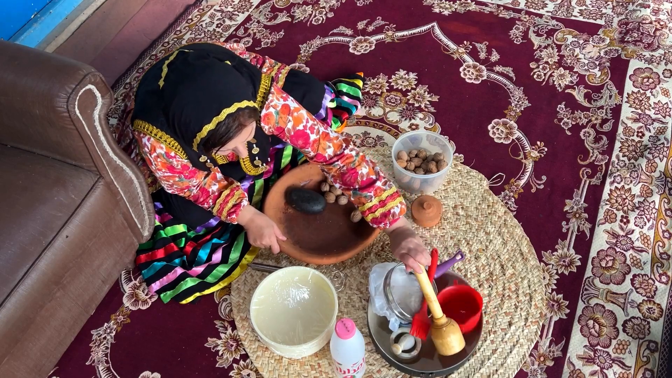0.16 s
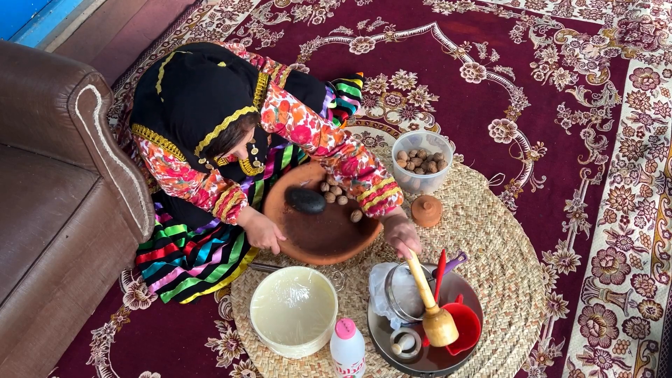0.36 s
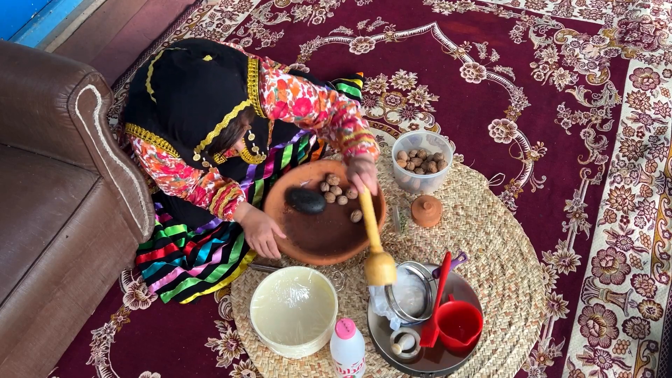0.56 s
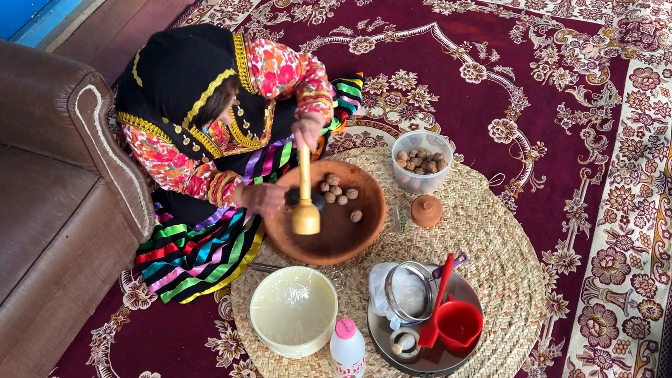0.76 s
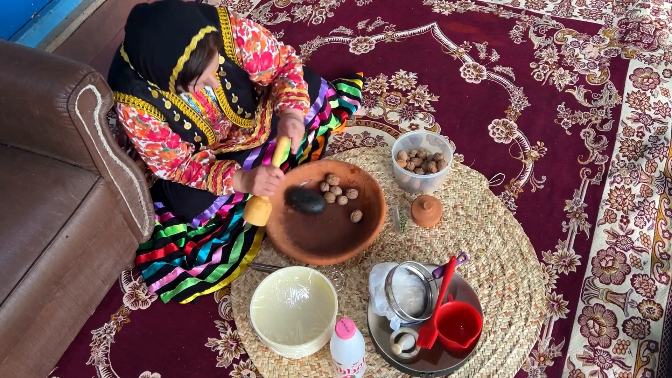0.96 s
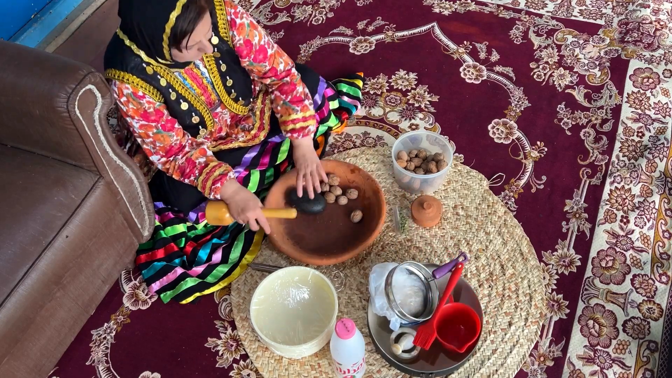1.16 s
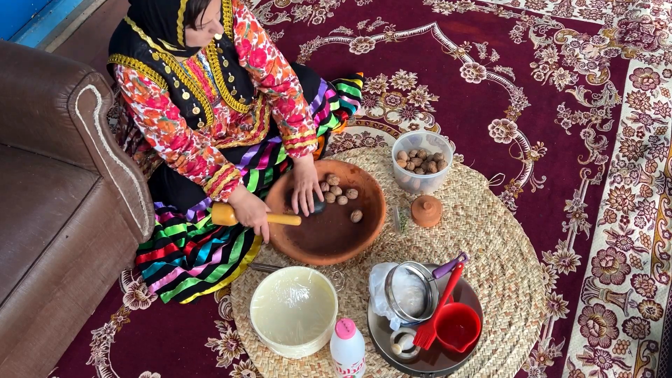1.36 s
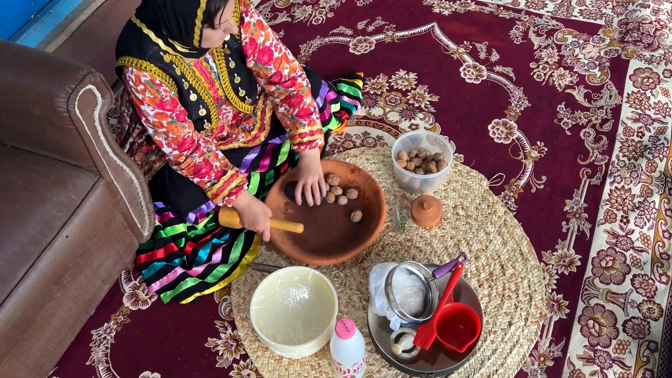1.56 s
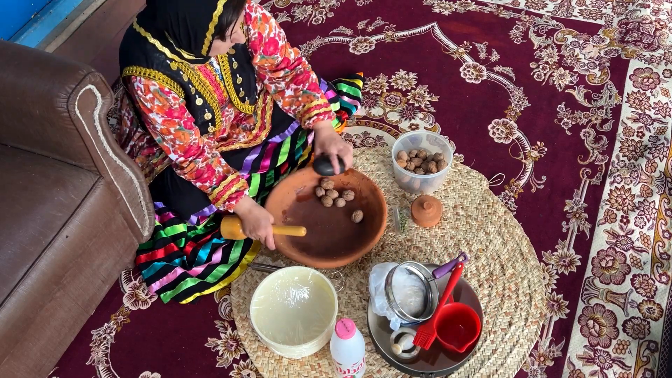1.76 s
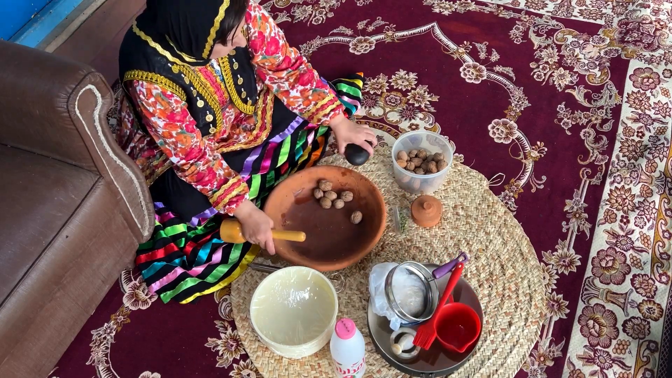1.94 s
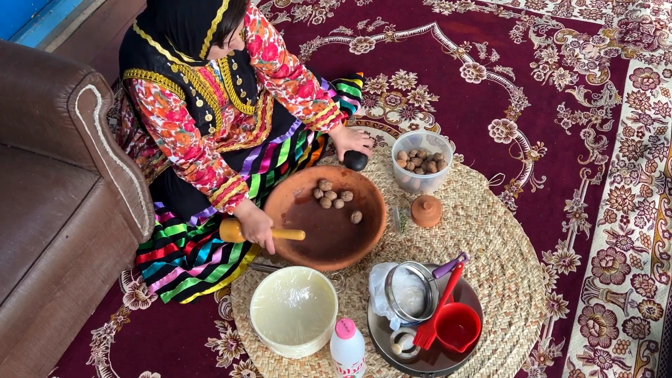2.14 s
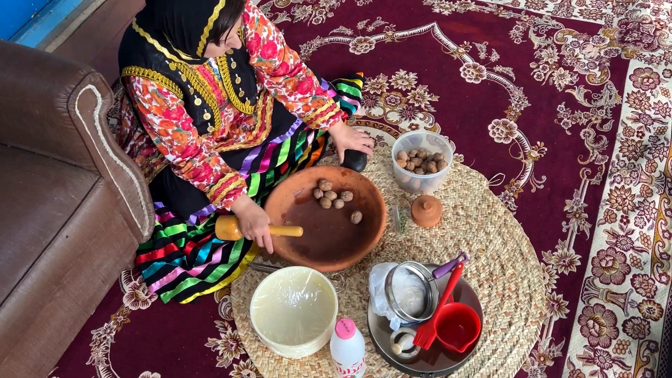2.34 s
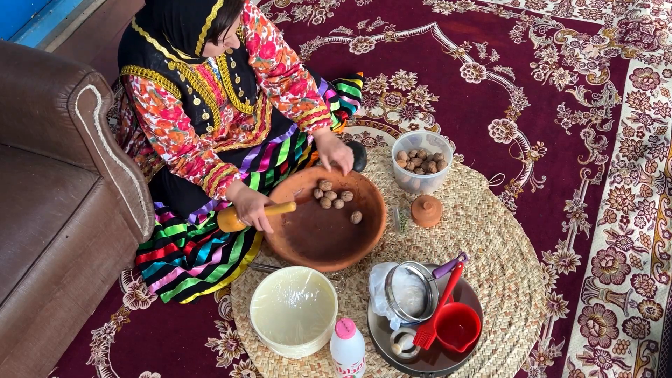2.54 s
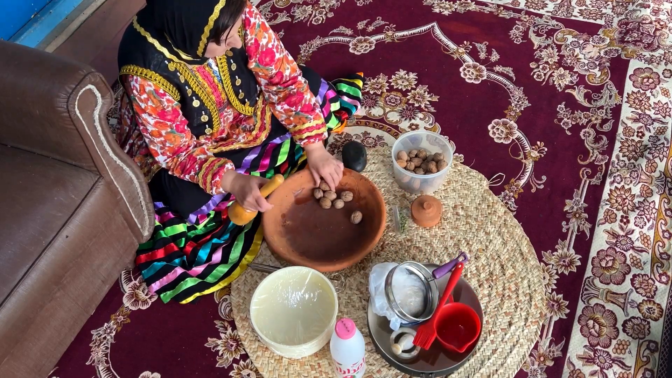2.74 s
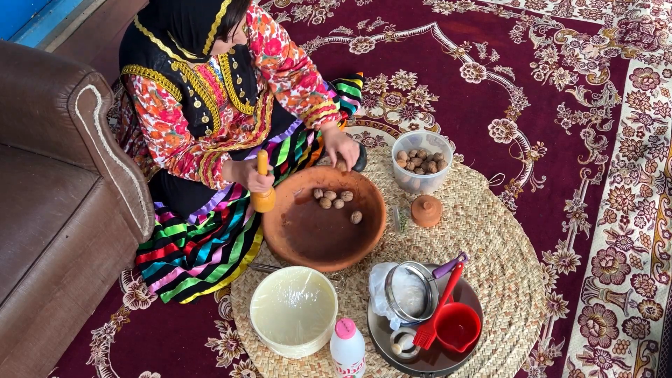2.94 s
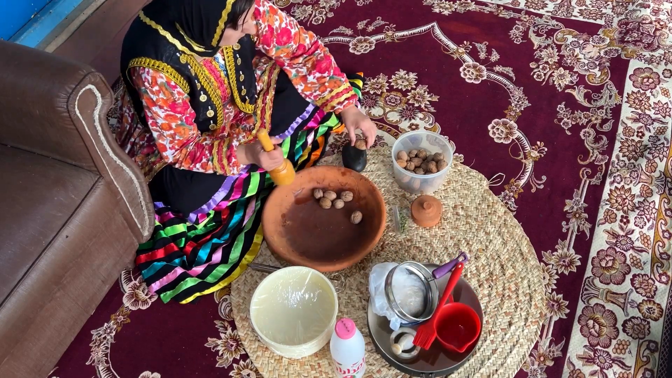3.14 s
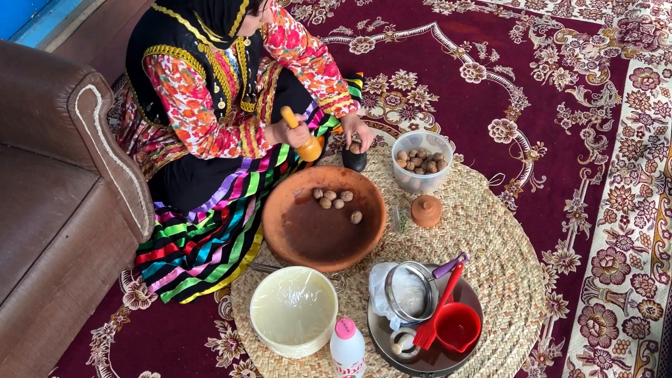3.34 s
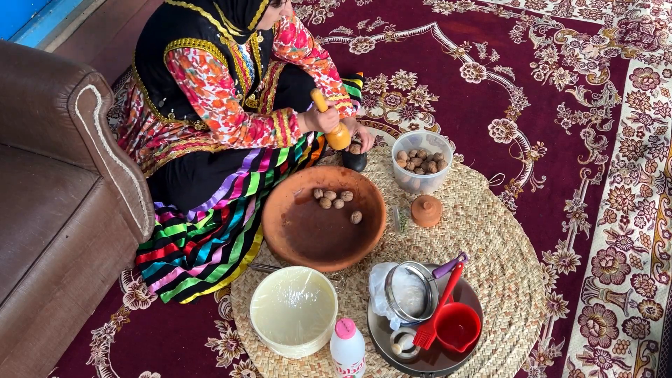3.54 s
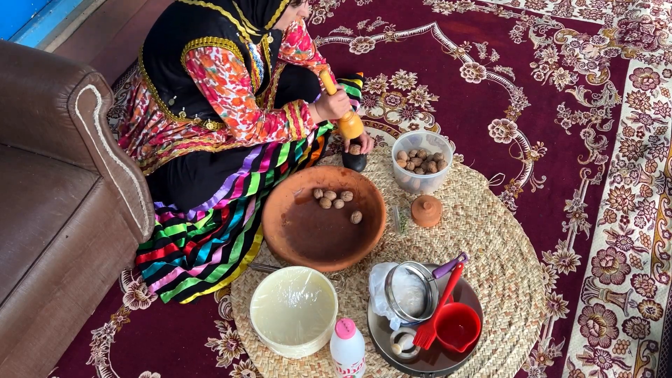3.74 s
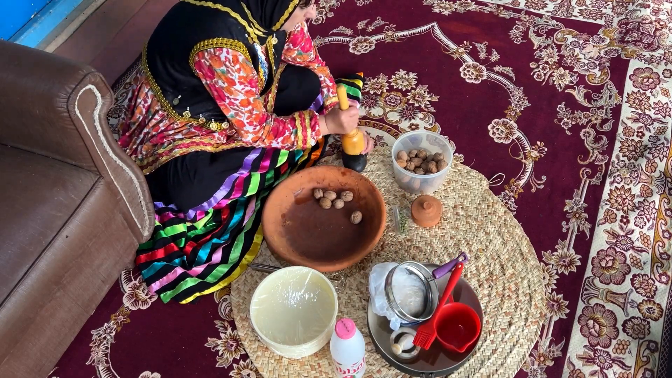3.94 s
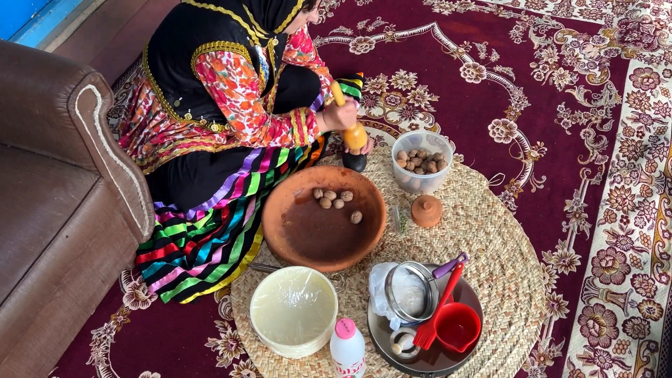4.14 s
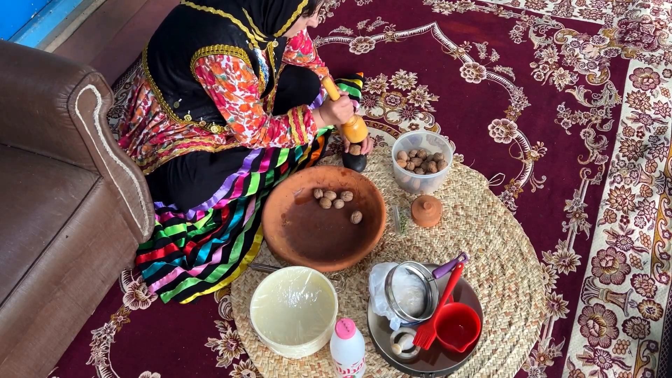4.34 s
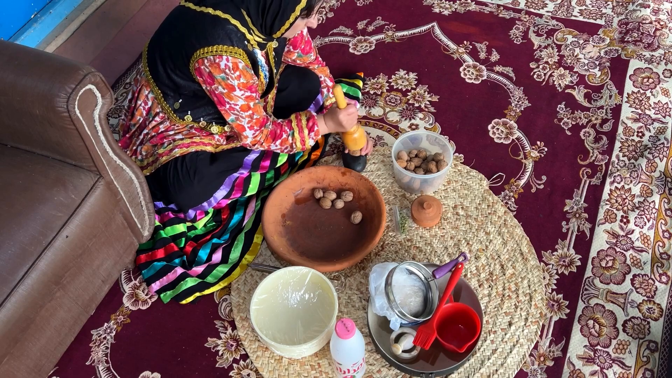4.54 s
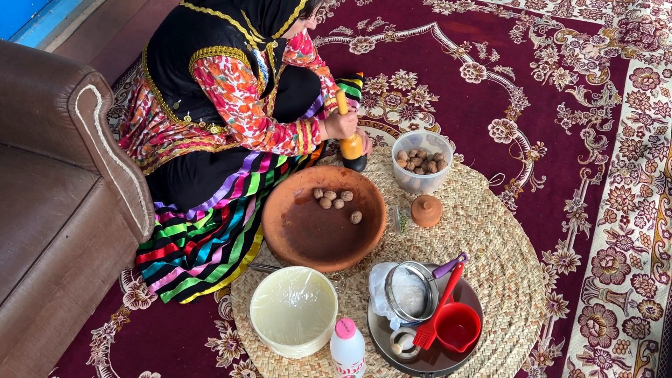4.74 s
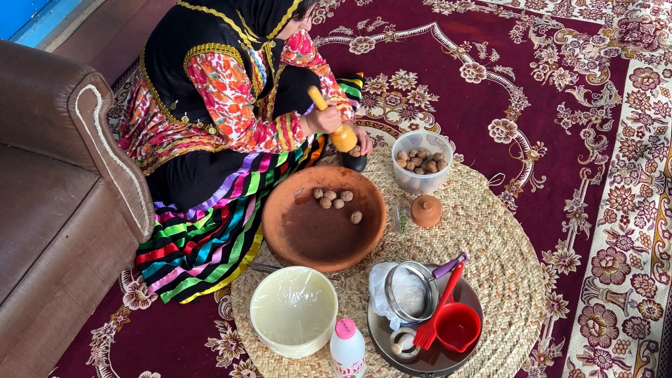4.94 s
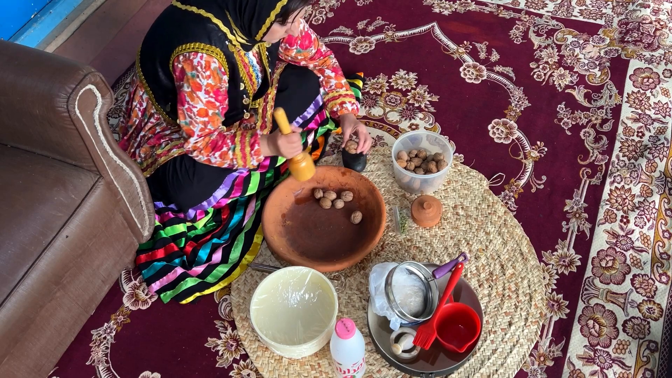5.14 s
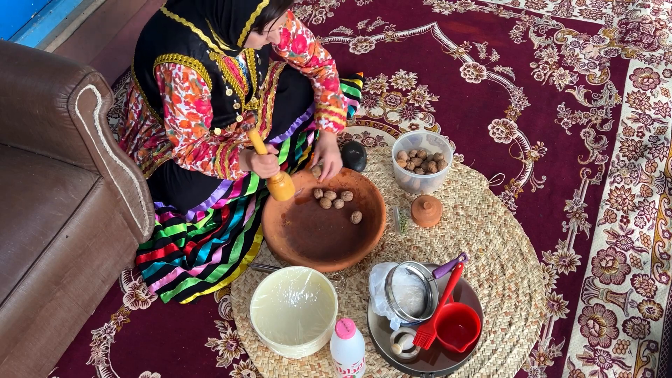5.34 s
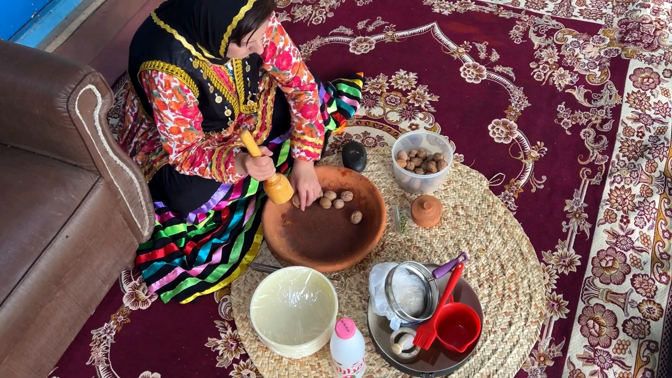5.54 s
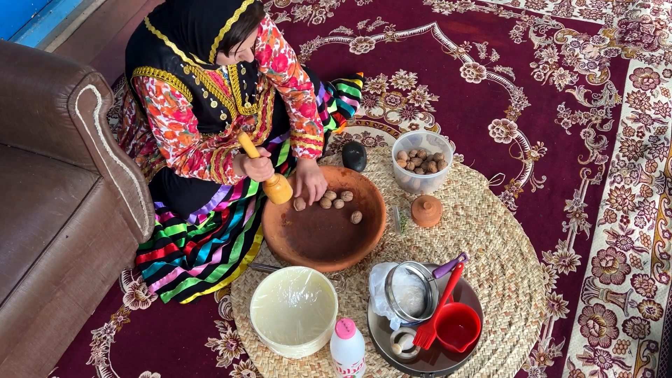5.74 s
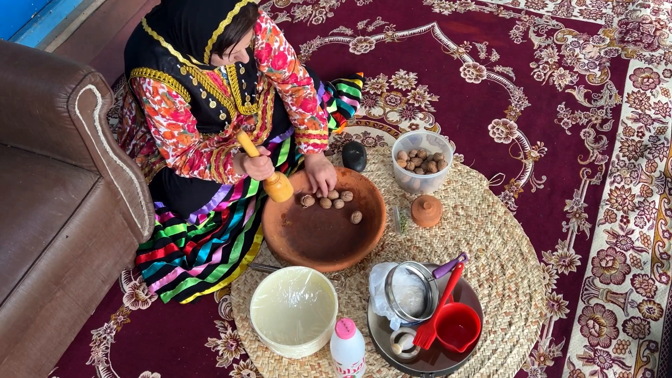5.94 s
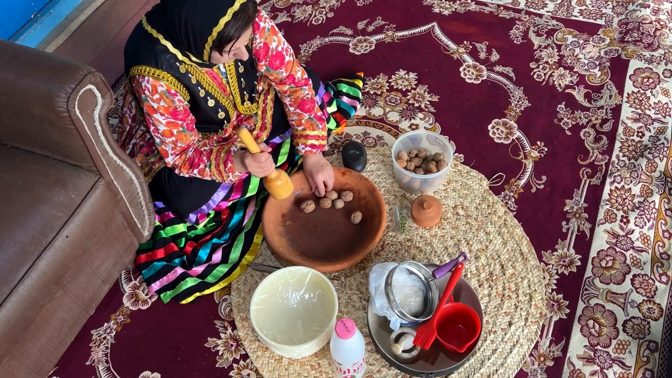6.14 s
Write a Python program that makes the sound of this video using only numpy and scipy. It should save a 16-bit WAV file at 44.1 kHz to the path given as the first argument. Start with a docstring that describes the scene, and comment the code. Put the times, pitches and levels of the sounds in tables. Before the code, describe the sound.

Hollow plastic clattering and light taps of nuts on clay surround four sharp knocks splitting a walnut shell, with soft hiss indoors.

```python
"""A plastic cup tips and clatters on a tray, hollow and bright, as a wooden pestle is lifted off.
Walnuts tick and roll in a ringing clay bowl, then four pestle blows crack a nut on a stone: the
shell snaps and crumbles, the wood knocks, the carpeted floor booms. Contacts ring short, decaying
modes; rattles and rolls are swarms of tiny contacts. The room is small and dull, and a handheld
camera hisses throughout."""
import sys
import numpy as np
from scipy import signal
from scipy.fft import rfft, irfft, next_fast_len
from scipy.io import wavfile
from scipy.ndimage import uniform_filter1d

SR = 44100
rng = np.random.default_rng(int(sys.argv[2]) if len(sys.argv) > 2 else 0)


def bounce(signal):
    """Save signal as a 16-bit WAV file at the path given by the first command-line argument."""
    frames = np.transpose(np.atleast_2d(signal))
    limited = np.clip(frames, -1, 1)
    pcm = np.round(limited * 32767).astype(np.int16)
    wavfile.write(sys.argv[1], SR, pcm)


N = 277389
FFT_SIZE = next_fast_len(N)

# Hollow knocks: the cup clatters on the tray; the last three are dull knocks of the pestle changing
# hands. Each row: start in seconds, body peak in dB, body centre in Hz, wall in dB against the body,
# wall centre in Hz, click in dB against the body.
HOLLOW_KNOCKS = [(.032, -35, 900, -9, 2000, -30), (.095, -28, 700, 2, 2570, -8),
                 (.101, -26, 910, -15, 2400, -20), (0.125, -28, 920, -10, 2500, -20),
                 (.176, -29, 640, -13, 2400, -30), (0.1791, -11.5, 620, -6.5, 3370, -23),
                 (.183, -17, 443, -5, 3400, -30), (0.196, -15, 760, -12, 3400, -18),
                 (.200, -22, 590, -1, 2030, -28), (.206, -19.5, 550, -14, 3420, -30),
                 (.210, -13, 860, -4, 3580, -24), (.212, -8, 617, -7, 1990, -30),
                 (.227, -32, 566, -10, 2050, -30), (.2352, -12.5, 630, -23, 2480, -36),
                 (.2523, -19.5, 560, -14, 2500, -36), (.263, -27, 544, -24.5, 2300, -36),
                 (.274, -22.5, 534, -22, 2300, -36), (.281, -28, 505, -33, 2300, -36),
                 (.293, -35, 563, -22, 2000, -36), (.312, -37, 550, -21, 1980, -36),
                 (.332, -33, 750, -12, 2000, -36), (0.342, -30, 630, -13, 2210, -30),
                 (0.358, -39, 800, -17, 2200, -36), (.4415, -21, 624, -9.5, 2620, -28),
                 (.447, -25, 680, -18, 2500, -36), (.500, -27, 597, -17, 2300, -33),
                 (.525, -29, 560, -17, 2200, -33), (1.116, -34, 525, -31, 2000, -36),
                 (1.128, -34, 850, -14.5, 2010, -33), (1.138, -32.5, 615, -23, 2000, -36)]
# The cup slides and trembles. Each row: time in seconds, body level in dB, wall level in dB.
CUP_RATTLE = [(0, -50, -58), (.035, -43.5, -52), (.075, -60, -74), (.1, -43.5, -45), (.165, -49, -52),
              (.205, -33, -33), (.26, -47, -51), (.31, -41.5, -55), (.37, -45, -46), (.44, -49, -58),
              (.58, -68, -73)]
# The cup's hollow body. Each row: pitch in Hz, relative level in dB, base t60 in seconds.
CUP_BODY_MODES = [(430, -5, 0.11), (526, 10.5, 0.051), (572, 3.5, 0.048), (755, 2, 0.07), (857, 0.5, 0.061),
                  (901, 3, 0.067), (1014, -20, 0.061), (1238, 6, 0.1), (1620, 7, 0.051)]
# Its thin wall. Each row: pitch in Hz, relative level in dB, base t60 in seconds.
CUP_WALL_MODES = [(1180, -1.5, 0.031), (1570, -3, 0.017), (2010, 0.5, 0.017), (2550, 0, 0.013),
                  (3000, -5, 0.012), (3413, 1.5, 0.011), (4100, -3, 0.014), (4640, 1, 0.014),
                  (5400, -2, 0.008), (6450, -2, 0.006), (8100, 1, 0.008)]
# Flat, dull knocks ring on; rim knocks are damped. Each row: wall in dB against the body, t60 factor.
KNOCK_DAMPING = [(-30, 1.5), (-17, 0.73), (-2, 0.32)]
# The tone of the noise bed on the left. Each row: frequency in Hz, relative level in dB.
HISS_EQ = [(25, -18), (45, -4.5), (90, 6), (130, -1), (260, -2.5), (650, -0.5), (1500, -2.5), (2600, -7.5),
           (4200, -10.5), (6200, -11.5), (7400, -15.5), (10000, -16.5), (11200, -17), (13000, -24.5),
           (15650, -20), (15950, -56)]
# The stereo image of the hiss. Each row: frequency in Hz, likeness of left and right from 0 to 1,
# the right channel's phase lead in half turns, its level against the left in dB.
HISS_IMAGE = [(0, .96, 0, -2), (170, .88, .05, -2.5), (400, .35, .4, -2), (750, .45, .85, -1),
              (1500, .35, .92, -2), (2000, .15, 1.5, -1.5), (2600, .46, 1.78, -1.5), (3700, .1, 1.8, -4.5),
              (5000, .14, 1.7, -9), (6400, .1, 1.6, -7), (8400, .67, 2.45, -2), (9450, 1, 3, 0),
              (10850, 1, 3, 0), (11500, .65, 3.4, 0), (12600, 1, 4, 0), (14100, 1, 4, 0),
              (14700, .65, 4.35, 0), (16000, .6, 4.8, 0)]
# The stereo image of the near sounds, with the same columns.
NEAR_IMAGE = [(0, .99, 0, -2), (300, .98, 0, -2.5), (550, .97, .05, .5), (850, .95, .1, 1.5),
              (2400, .8, -.14, 1), (3400, .8, -.35, -2), (5200, .65, -.15, -6), (6300, .75, .15, -5.5),
              (7900, .8, .28, -1), (9300, .96, .86, 0), (10000, 1, 1, 0), (16500, .96, 2.95, 0)]
# A nut taps the bowl. Each row: start in seconds, peak in dB, ring centre in Hz,
# shell click in dB against the bowl.
BOWL_TICKS = [(1.436, -35.5, 810, -25), (1.447, -30, 1390, -8), (1.4665, -30, 3160, -2),
              (2.756, -38.5, 1400, -9), (5.628, -26, 2480, 5), (5.632, -30, 2920, 5),
              (5.7785, -30, 2300, -29), (5.879, -37, 2170, -13), (5.852, -39, 2500, -6),
              (5.899, -33, 1680, -20), (5.906, -32, 2210, -20), (5.950, -37, 3000, -17),
              (6.031, -37, 2380, -20), (6.041, -30.5, 2160, -20)]
# Nuts roll. Each row: start in seconds, length in seconds, level in dB, ring centre in Hz.
BOWL_ROLLS = [(1.439, 0.047, -53, 1520), (5.897, 0.063, -49, 1900), (5.991, 0.083, -46.5, 1850),
              (6.157, 0.035, -49, 1480), (6.253, 0.024, -52, 2400)]
# Fired clay. Each row: pitch in Hz, relative level in dB, base t60 in seconds.
BOWL_MODES = [(824, 1, 0.16), (1400, 0, 0.074), (1580, -8, 0.027), (2070, -7, 0.017), (2192, 4.5, 0.037),
              (2380, 0, 0.05), (2540, -6, 0.019), (2970, -5, 0.02), (3228, 3, 0.026)]
# Walnut shell. Each row: pitch in Hz, relative level in dB, base t60 in seconds.
SHELL_MODES = [(1340, -4, 0.03), (1940, -4.5, 0.017), (2310, -5, 0.021), (2710, 1.5, 0.01),
               (3060, 0, 0.0071), (3410, 1, 0.01), (3720, 1.5, 0.0078), (4180, 3, 0.0076),
               (4740, 2, 0.0093), (5040, -1, 0.012), (5950, 0, 0.0087), (6550, -3, 0.014),
               (7200, 1, 0.0064), (8350, 3, 0.007)]
# The shell breaks. Each row: start in seconds, peak in dB, ring centre in Hz, tick in dB against the ring.
SHELL_SNAPS = [(3.8862, -15, 4000, -3), (3.8903, -21, 4600, -18), (3.8938, -20, 4300, -5),
               (3.894, -21, 2150, -20), (3.898, -21, 2250, -18), (3.8985, -24, 4500, -15),
               (4.1851, -3, 3100, -9), (4.1862, -5, 2300, -12), (4.1858, -12, 6100, 6),
               (4.1865, -20, 1290, -20), (4.1902, -17, 4000, -14), (4.194, -18, 6000, -8),
               (4.198, -20, 2520, -14), (4.4504, -13, 3340, -3), (4.4517, -4, 6500, -5),
               (4.452, -23, 1290, -20), (4.4533, -6, 2000, -2), (4.4538, -10, 6600, -2),
               (4.4605, -12, 6300, -2), (4.4603, -16, 1986, -8), (4.47, -22, 6000, -6),
               (4.7303, -23, 3100, 0), (4.7304, -25, 6600, -3), (4.7363, -18, 7000, 0),
               (4.7365, -19, 4750, -6), (4.7365, -16, 2800, -8)]
# The pestle lands. Each row: start in seconds, levels of knock, boom and crumble in dB, then the
# crumble's t60 in seconds, centre in Hz and roll-off in dB per octave.
PESTLE_BLOWS = [(3.887, -19, -40, -26.5, 0.12, 3870, 35), (4.185, -31, -35.5, -23, 0.15, 3000, 3.5),
                (4.4508, -36, -33.5, -16.5, 0.1, 5000, 2), (4.731, -53, -40, -31.5, 0.13, 4500, 5)]
# The wooden knock. Each row: pitch in Hz, relative level in dB, base t60 in seconds.
PESTLE_MODES = [(267, -4, 0.057), (413, 2, 0.044), (507, -11, 0.089), (825, -10, 0.013)]
# The floor answers late. Each row: pitch in Hz, level in dB against the boom,
# delay in seconds counted from 15 ms before the blow, t60 in seconds.
FLOOR_MODES = [(149, 3.5, 0.0204, 0.077), (93.5, 2.5, 0.0446, 0.12)]
# The base tone of crumbling shell. Each row: frequency in Hz, relative level in dB.
CRUMBLE_EQ = [(600, -8), (1300, -4), (2000, -3.5), (3000, -2.5), (4200, 2), (5300, -1), (6500, 1.5),
              (9000, 1.5), (12000, 3), (16000, -12)]


def gain_of(db):
    """Decibels to a factor."""
    return 10 ** (np.asarray(db) / 20)


def unit_rms(x):
    """Scales to rms 1."""
    return x / np.sqrt(np.mean(x ** 2) + 1e-20)


def unit_peak(x):
    """Scales to peak 1."""
    return x / abs(x).max()


def add(mix, start, sound):
    """Mixes a sound in at start seconds."""
    part = mix[round(start * SR):][:len(sound)]
    part += sound[:len(part)]


def equalise(x, points):
    """Filters by (Hz, dB) points joined on a log axis."""
    hz, db = np.transpose(points)
    bins = np.fft.rfftfreq(len(x), 1 / SR)
    return irfft(rfft(x) * gain_of(np.interp(np.log(bins + 1), np.log(hz), db)), len(x))


def ring(modes, centre_hz, rolloff_db, t60_scale, cycles=1.187, spread_ms=0):
    """A contact drives the modes for some cycles of centre_hz; each octave away loses rolloff_db."""
    hz, db, t60 = np.transpose(modes)[:, :, None]
    late = spread_ms / 1000 * rng.random(hz.shape)  # a tearing contact staggers the modes
    t = np.arange(round(SR * (t60.max() * t60_scale + .004))) / SR - cycles / centre_hz - late
    attack = np.cos(np.pi / 2 * np.clip(t * centre_hz / cycles, -1, 0)) ** 2
    struck_db = db - rolloff_db * abs(np.log2(hz / centre_hz))
    decay_db = 60 * np.maximum(t, 0) / (t60 * t60_scale)
    return (attack * gain_of(struck_db - decay_db) * np.sin(2 * np.pi * hz * t)).sum(0)


def click(rise_ms, low_hz):
    """A spit of noise above low_hz that swells and quickly dies."""
    age = np.arange(SR // 50) / SR * 1000 / max(rise_ms, .05)
    highpass = signal.butter(2, low_hz, "high", fs=SR, output="sos")
    noise = signal.sosfilt(highpass, rng.standard_normal(len(age)))
    return unit_peak(noise * age * np.exp(-age))


def grains(times, levels_db, grain, per_s, spread_db):
    """A swarm of tiny contacts rides a level curve; returns its start and its sound."""
    t = np.arange(times[0], times[-1], 1 / SR)
    size, chance, polarity = rng.random((len(t), 3)).T
    hits = gain_of(-spread_db * np.log(size + .017)) * (chance < per_s / SR) * np.sign(polarity - .5)
    swarm = unit_rms(signal.fftconvolve(hits, grain)[:len(t)])
    return times[0], swarm * gain_of(np.interp(t, times, levels_db)) * signal.windows.tukey(len(t), .05)


def hollow_clatter():
    """Soft knocks ring the cup's body, sharp ones wake its wall and click; a rattle runs between.
    The dull knocks of the pestle changing hands borrow the same modes."""
    out = np.zeros(N)
    for start, db, hz, wall_db, wall_hz, click_db in HOLLOW_KNOCKS:
        t60_scale = np.interp(wall_db, *np.transpose(KNOCK_DAMPING))
        body = ring(CUP_BODY_MODES, hz, rolloff_db=13, t60_scale=t60_scale, cycles=1.736)
        wall = ring(CUP_WALL_MODES, wall_hz, rolloff_db=15, t60_scale=1.03, cycles=3.01, spread_ms=1.59)
        add(out, start, gain_of(db) * unit_peak(body))
        add(out, start + .00018, gain_of(db + wall_db) * unit_peak(wall))
        add(out, start - .0006, gain_of(db + click_db) * click(rise_ms=4.2, low_hz=3500))
    times, body_db, wall_db = np.transpose(CUP_RATTLE)
    body = ring(CUP_BODY_MODES, 863, rolloff_db=2.8, t60_scale=.32)
    add(out, *grains(times, body_db, body, per_s=1000, spread_db=2.5))
    wall = ring(CUP_WALL_MODES, 1570, rolloff_db=2.5, t60_scale=.61)
    add(out, *grains(times, wall_db, wall, per_s=1200, spread_db=3.5))
    return out


def widen(left, other, image):
    """The right channel is a blend of left and other, recoloured and shifted in phase."""
    hz, *columns = np.transpose(image)
    bins = np.fft.rfftfreq(FFT_SIZE, 1 / SR)
    likeness, lead, db = (np.interp(bins, hz, column) for column in columns)
    blend = likeness * rfft(left, FFT_SIZE) + np.sqrt(1 - likeness ** 2) * rfft(other, FFT_SIZE)
    right = irfft(blend * gain_of(db) * np.exp(1j * np.pi * lead), FFT_SIZE)
    return np.array([left[:N], right[:N]])


def hiss(level_db=-44.5):
    """A bed of room rumble and microphone noise, swelling very slightly."""
    left, other, drift = rng.standard_normal((FFT_SIZE, 3)).T
    drift = unit_rms(uniform_filter1d(uniform_filter1d(drift, 2500), 2500))
    swell = gain_of(level_db + .5 * drift)
    left, other = (swell * unit_rms(equalise(noise, HISS_EQ)) for noise in (left, other))
    return widen(left, other, HISS_IMAGE)


def nuts_in_bowl():
    """Nuts tick against fired clay and roll over it; a roll swells, holds and fades."""
    out = np.zeros(N)
    for start, db, hz, click_db in BOWL_TICKS:
        clay = ring(BOWL_MODES, hz, rolloff_db=22.5, t60_scale=.75, cycles=1.6)
        shell = ring(SHELL_MODES, 4400, rolloff_db=12, t60_scale=1.2, cycles=1.5)
        add(out, start, gain_of(db) * unit_peak(clay))
        add(out, start, gain_of(db + click_db) * unit_peak(shell))
    for start, length, db, hz in BOWL_ROLLS:
        times = [start, start + .0087, start + .66 * length, start + length]
        clay = ring(BOWL_MODES, hz, rolloff_db=6, t60_scale=1)
        add(out, *grains(times, [db - 3, db, db, db - 18], clay, per_s=700, spread_db=3))
    return out


def shell_snaps():
    """Each break jolts the shell into a brief ring and spits a treble tick."""
    out = np.zeros(N)
    for start, db, hz, tick_db in SHELL_SNAPS:
        tear = .1225 * hz / 1000  # brighter breaks tear for longer
        shell = ring(SHELL_MODES, hz, rolloff_db=24.5, t60_scale=.78, cycles=1.536, spread_ms=.698 * tear)
        add(out, start, gain_of(db) * unit_peak(shell))
        add(out, start, gain_of(db + tick_db) * click(rise_ms=.8 * tear, low_hz=8000))
    return out


def crumble(t, centre_hz, rolloff_db):
    """Crushed shell makes a fine, lumpy crackle whose treble dies first."""
    flutter, noise = rng.standard_normal((len(t), 2)).T
    lumps = gain_of(2.2 * unit_rms(uniform_filter1d(flutter, 60)))
    tone = [(hz, db - rolloff_db * abs(np.log2(hz / centre_hz))) for hz, db in CRUMBLE_EQ]
    crumbs = equalise(noise, tone)
    treble = equalise(crumbs, [(5000, -40), (8000, -21)])
    crumbs -= treble * (1 - gain_of(-260 * t))
    return unit_rms(crumbs * lumps)


def pestle_blows():
    """The pestle knocks, the shell crumbles under it, the floor booms a moment later."""
    out, t = np.zeros(N), np.arange(SR // 4) / SR
    for start, knock_db, boom_db, crumble_db, t60, centre_hz, rolloff_db in PESTLE_BLOWS:
        knock = ring(PESTLE_MODES, 424, rolloff_db=1.8, t60_scale=.94, cycles=.76)
        add(out, start, gain_of(knock_db) * unit_peak(knock))
        envelope = np.minimum(t / .00039, 1) * gain_of(crumble_db - 60 * t / t60)
        add(out, start, envelope * crumble(t, centre_hz, rolloff_db))
        for hz, db, delay, boom_t60 in FLOOR_MODES:
            swell = np.minimum(t / .009, 1) ** 2 * gain_of(boom_db + db - 60 * t / boom_t60)
            add(out, start + delay - .015, swell * np.sin(2 * np.pi * hz * t))
    return out


def carpeted_room(x, t60=.1, predelay_s=.0046):
    """Sparse reflections die fast, and the carpet swallows their treble."""
    t = np.arange(SR // 3) / SR
    chance, polarity = rng.random((len(t), 2)).T
    taps = (chance < .12) * np.sign(polarity - .5) * gain_of(-60 * t / t60) * (t >= predelay_s)
    reflections = signal.oaconvolve(x, taps / np.linalg.norm(taps))[:N]
    return signal.lfilter(*signal.butter(1, 6000, fs=SR), reflections)


def smear(x, size=256):
    """Scrambles the phase over a few milliseconds and leaves the colour alone."""
    spectrum = rfft(rng.standard_normal(size) * np.exp(-np.arange(size) / (size / 6)), 4 * size)
    return signal.oaconvolve(x, irfft(spectrum / abs(spectrum)))[:N]


def scene():
    """The near sounds with a touch of room, spread to stereo over the hiss."""
    near = hollow_clatter() + nuts_in_bowl() + shell_snaps() + pestle_blows()
    left = near + gain_of(-13) * carpeted_room(near)
    return widen(left, smear(left), NEAR_IMAGE) + hiss()


def record(dry, drive=1.05, cutoff_hz=16400):
    """The input stage rounds off the loudest cracks; a steep low-pass trims the top."""
    rounded = np.tanh(drive * dry) / drive
    lowpass = signal.firwin(511, cutoff_hz, window=("kaiser", 9), fs=SR)
    return signal.oaconvolve(rounded, lowpass[None], "same")


dry = scene()
out = record(dry)
bounce(out)
```